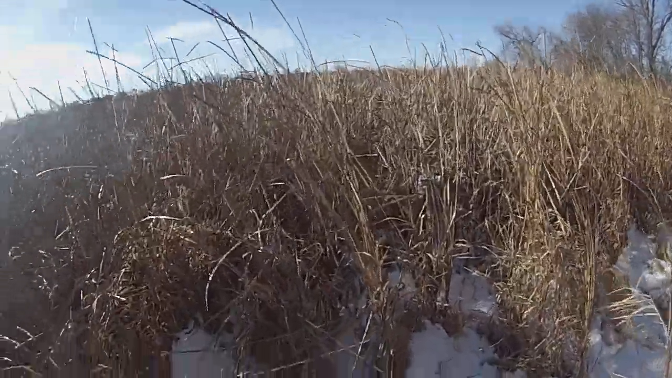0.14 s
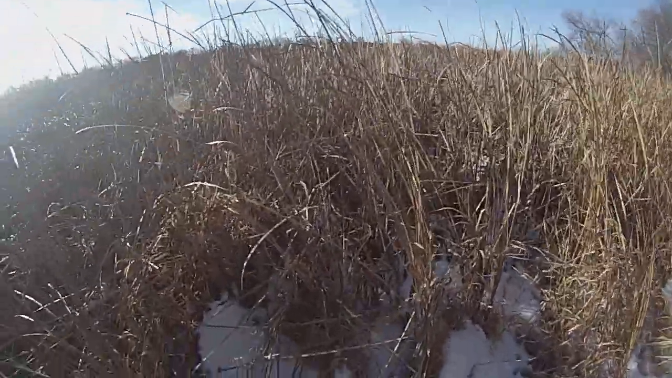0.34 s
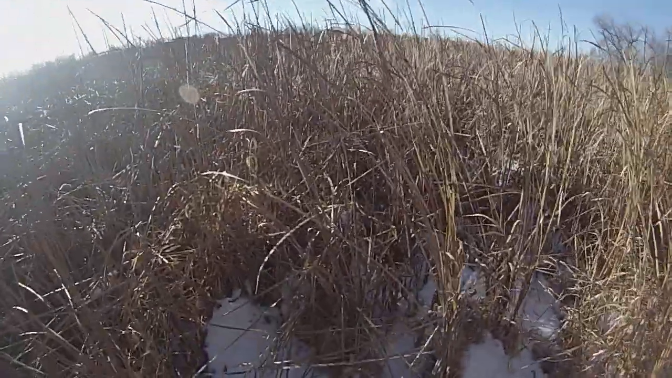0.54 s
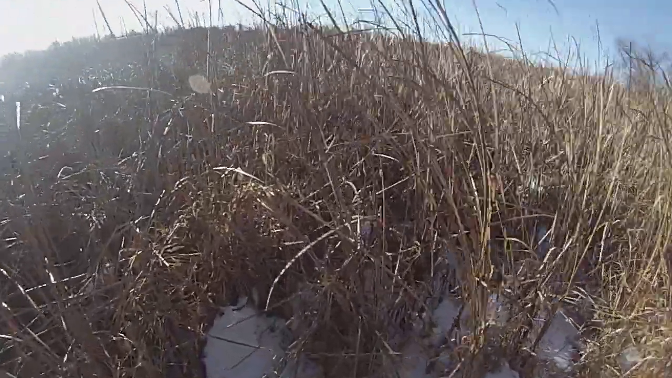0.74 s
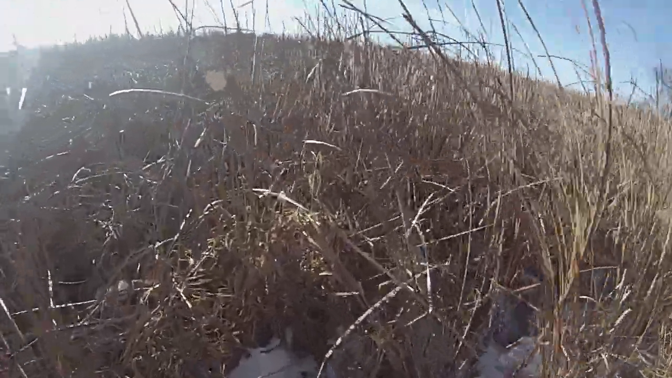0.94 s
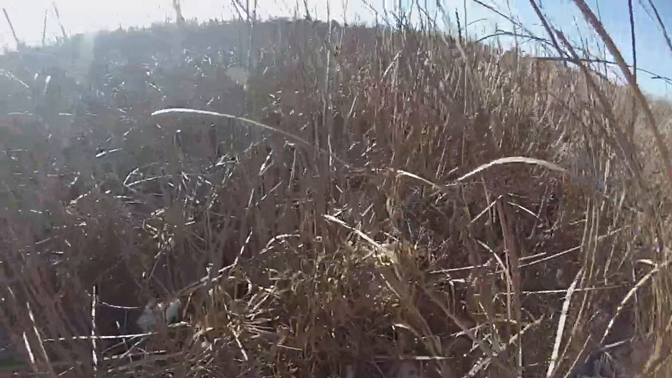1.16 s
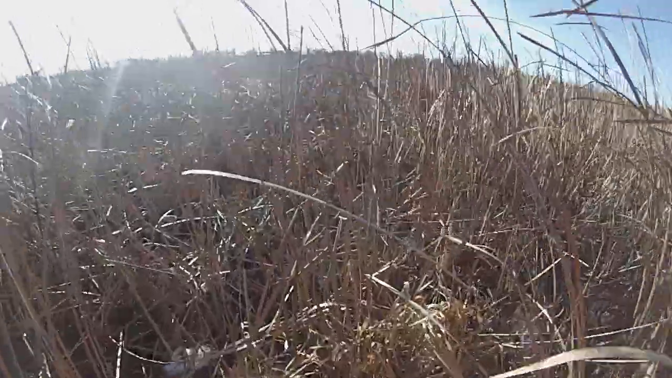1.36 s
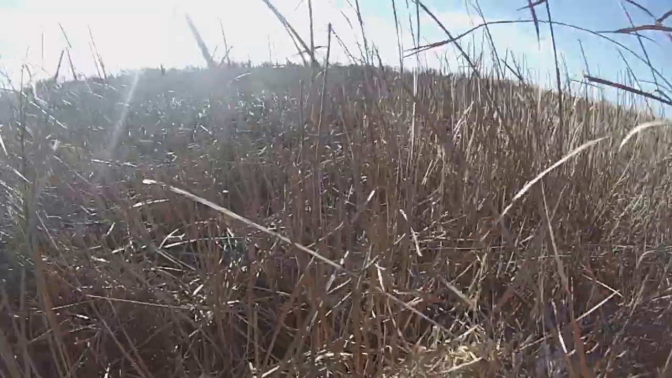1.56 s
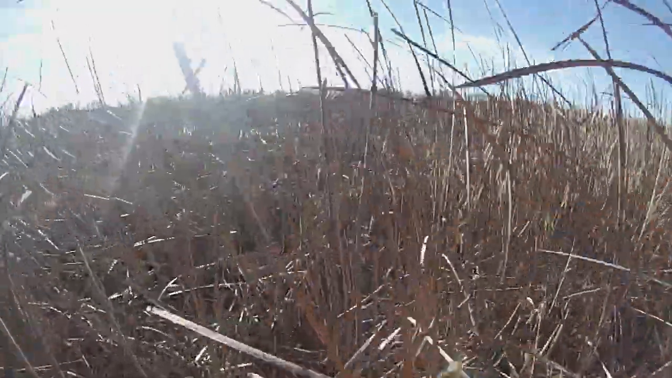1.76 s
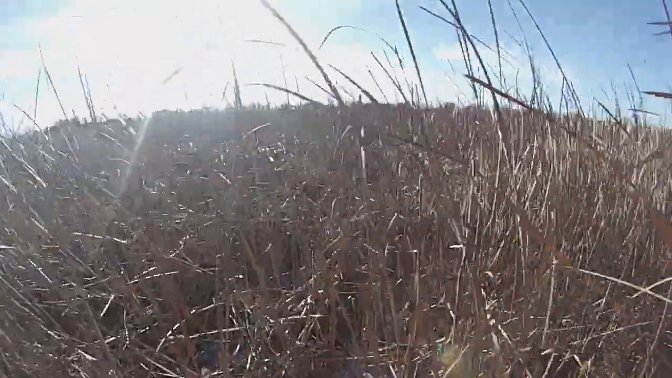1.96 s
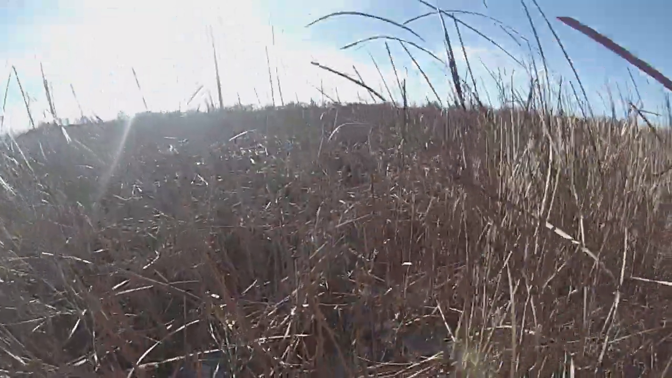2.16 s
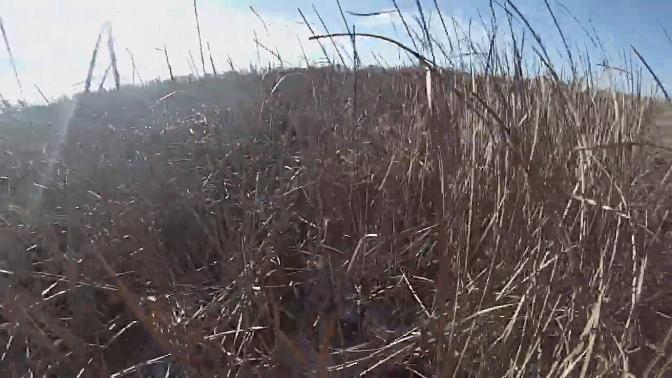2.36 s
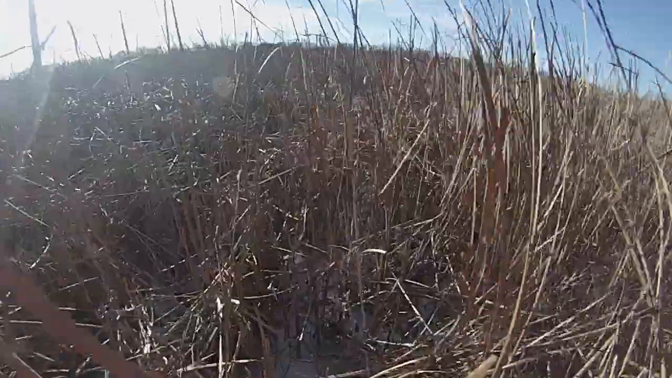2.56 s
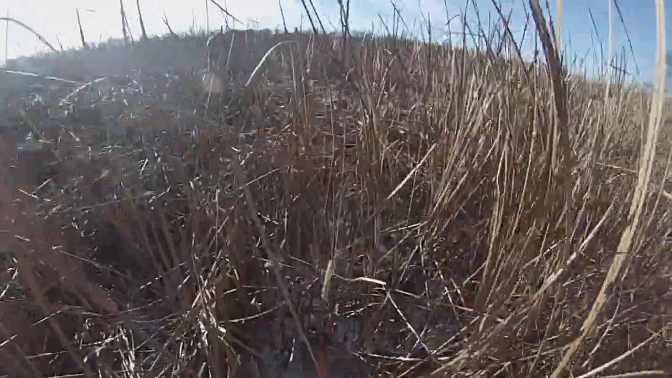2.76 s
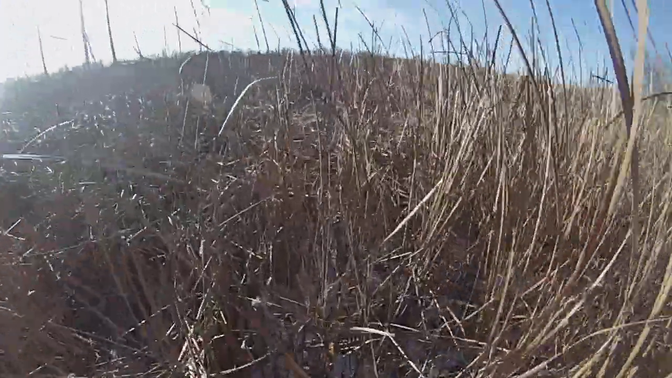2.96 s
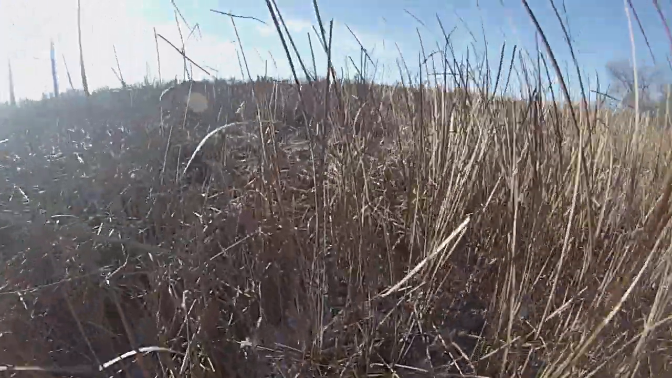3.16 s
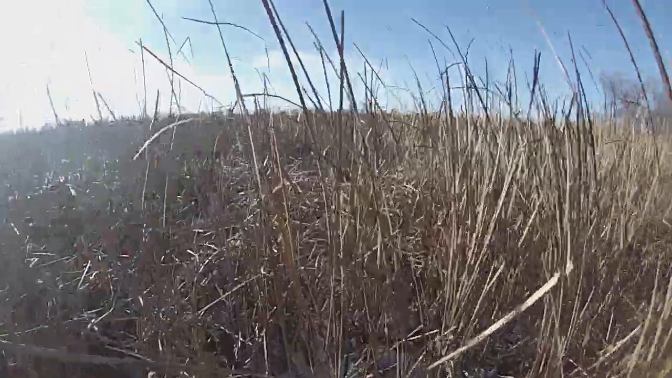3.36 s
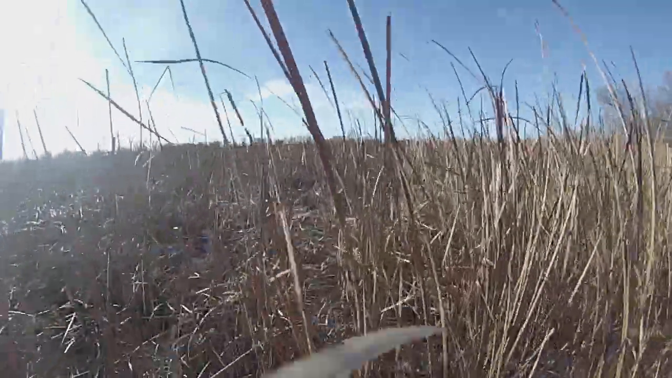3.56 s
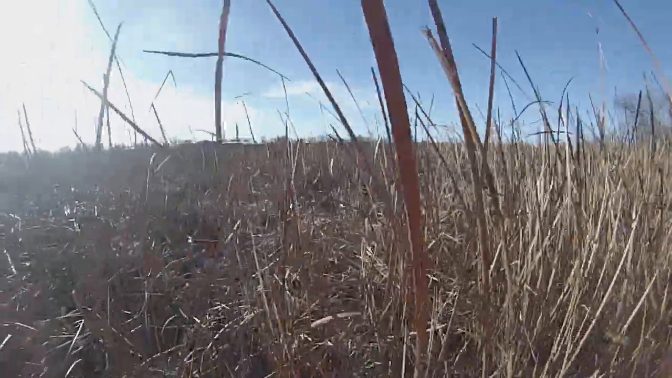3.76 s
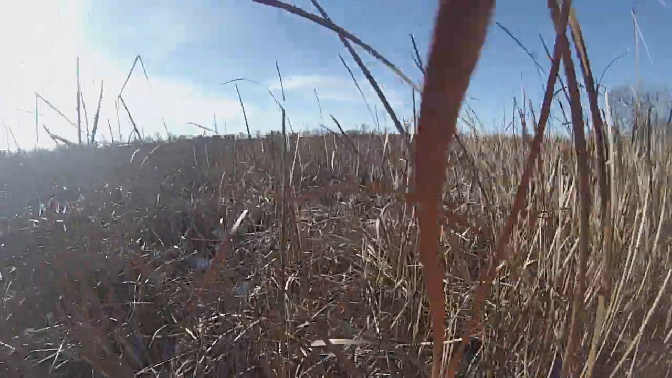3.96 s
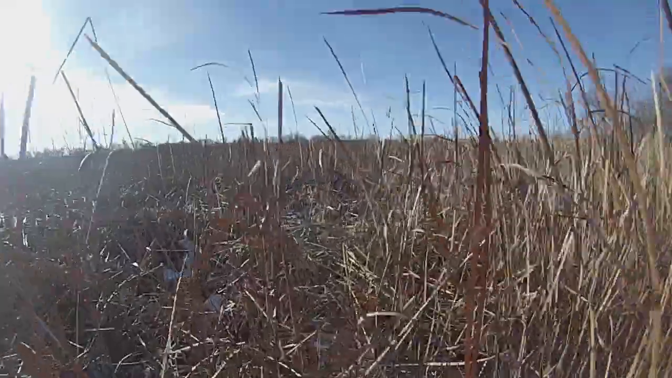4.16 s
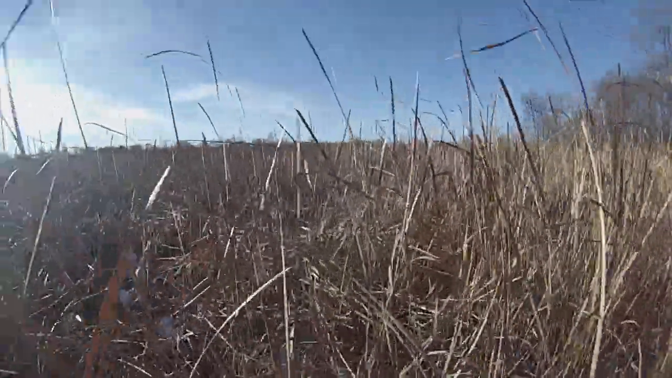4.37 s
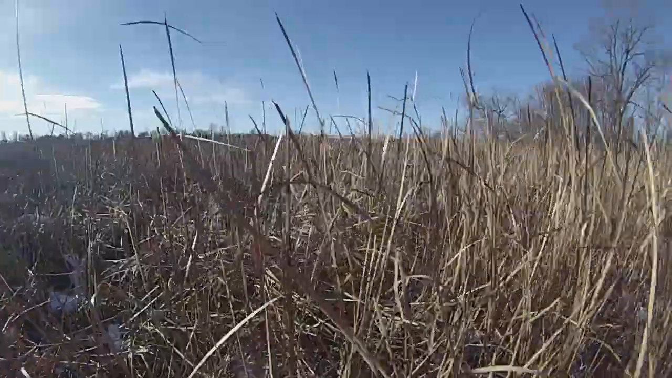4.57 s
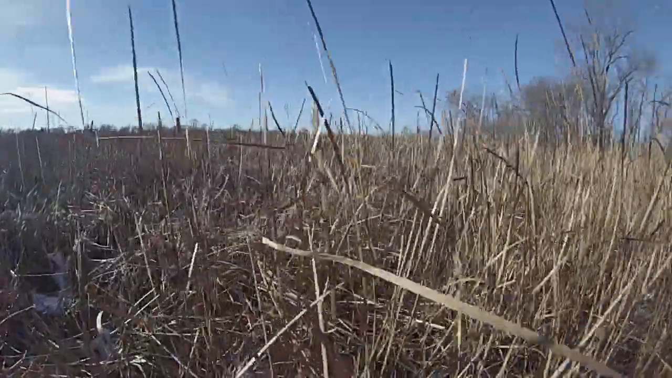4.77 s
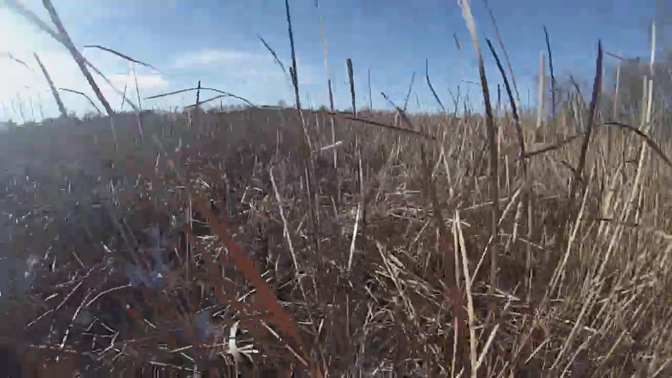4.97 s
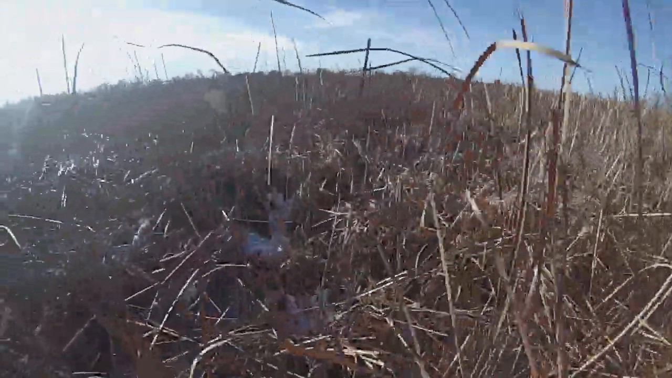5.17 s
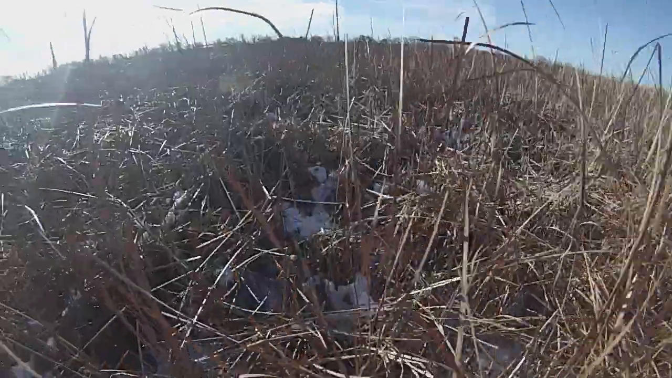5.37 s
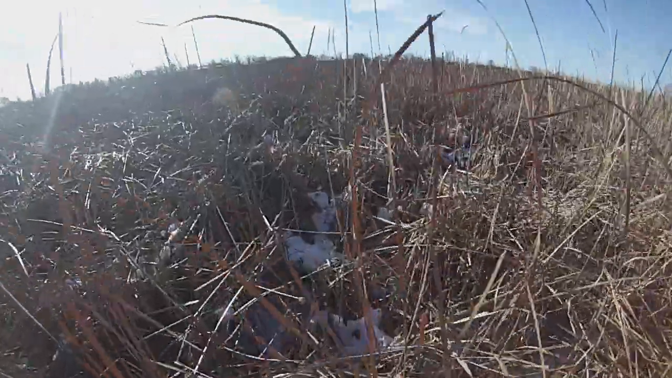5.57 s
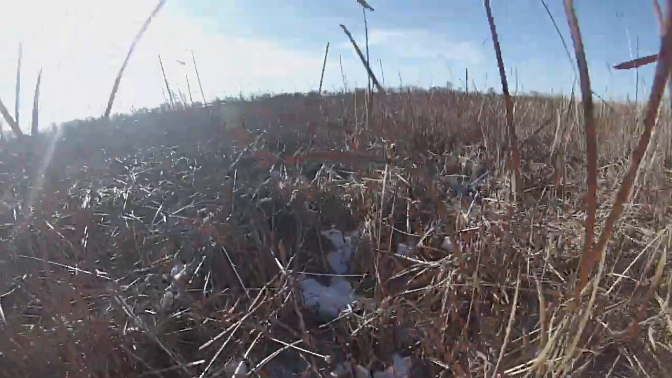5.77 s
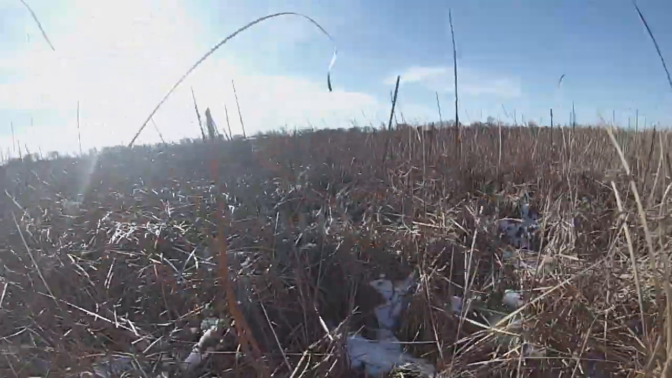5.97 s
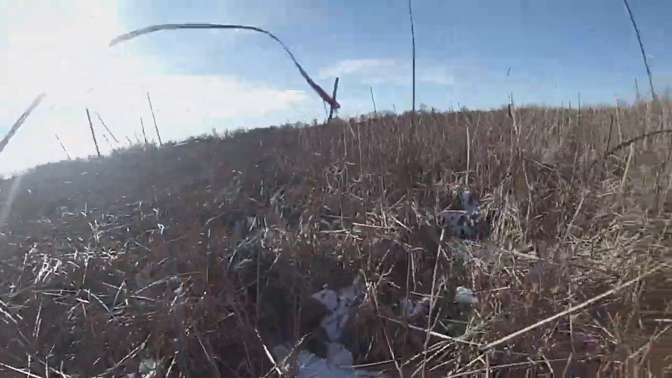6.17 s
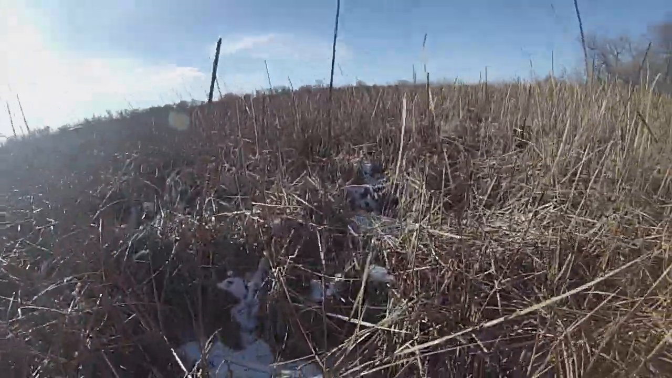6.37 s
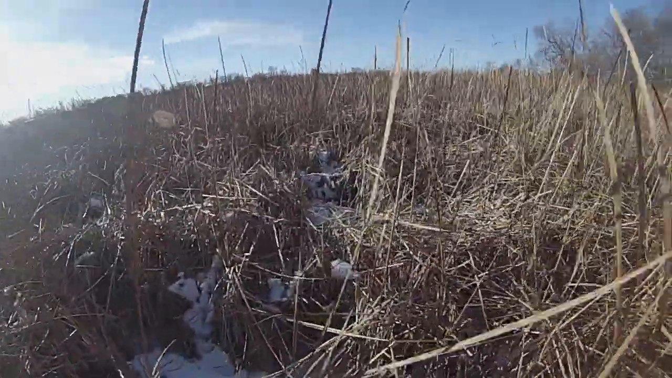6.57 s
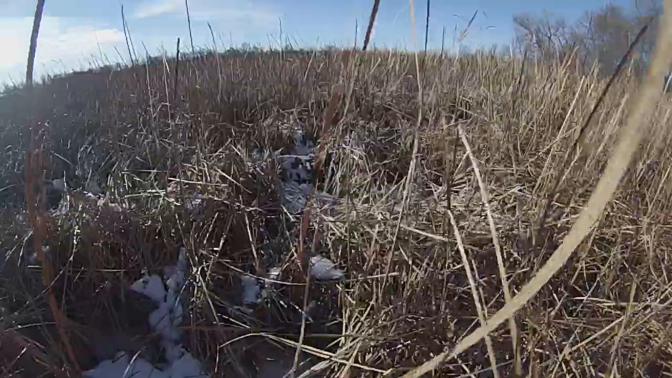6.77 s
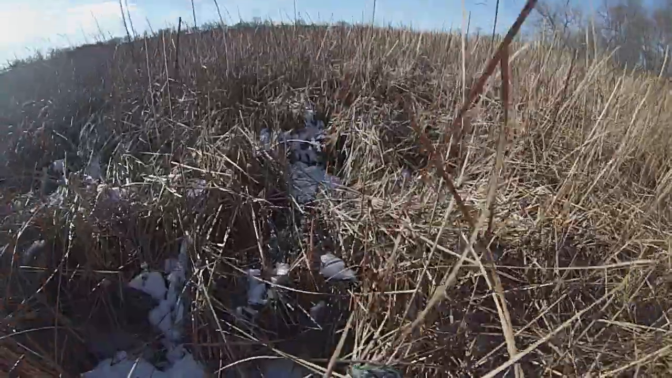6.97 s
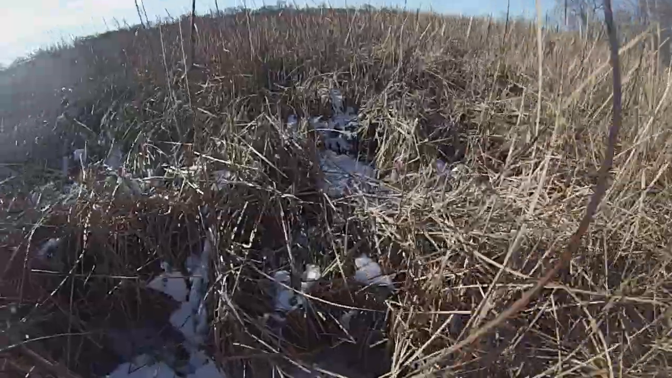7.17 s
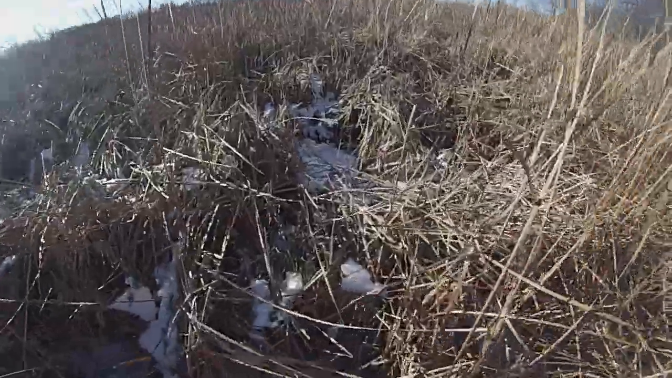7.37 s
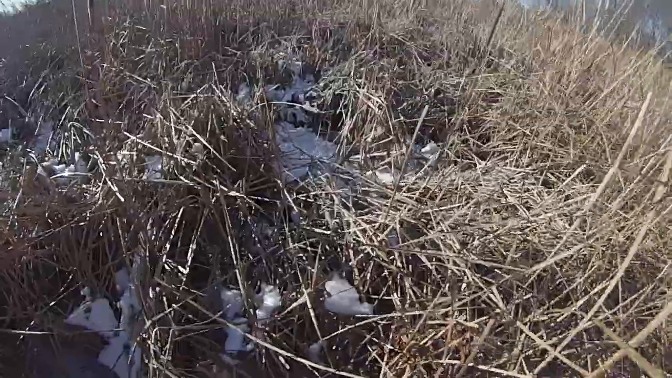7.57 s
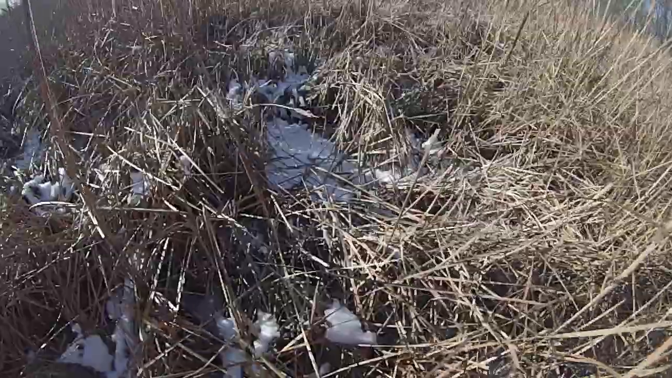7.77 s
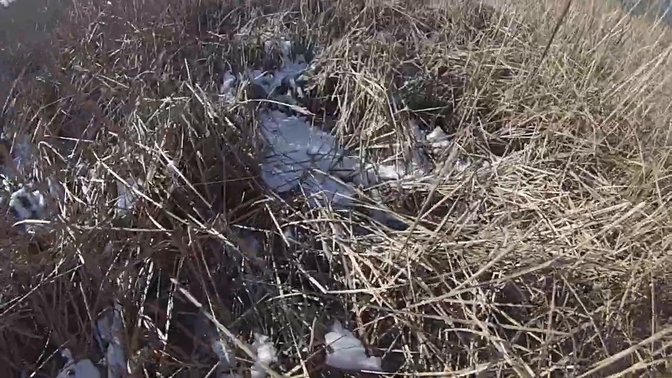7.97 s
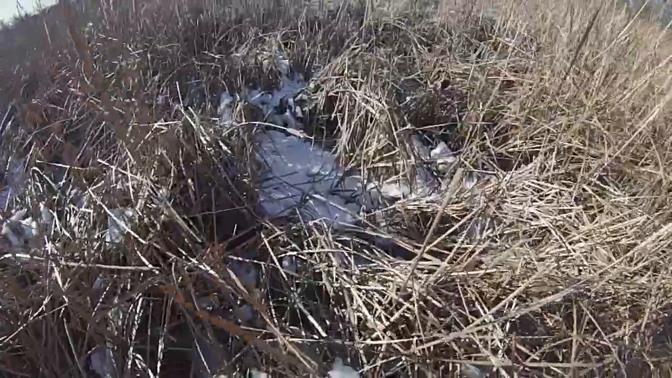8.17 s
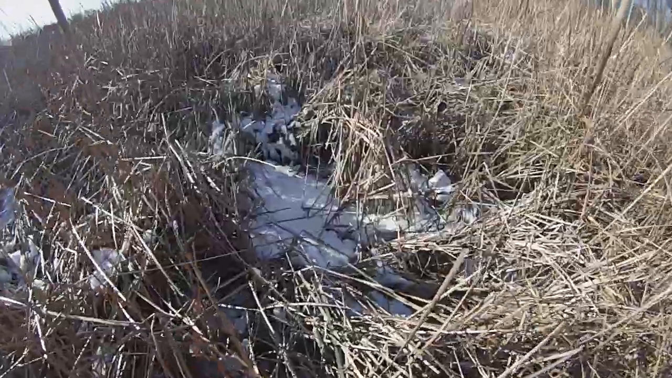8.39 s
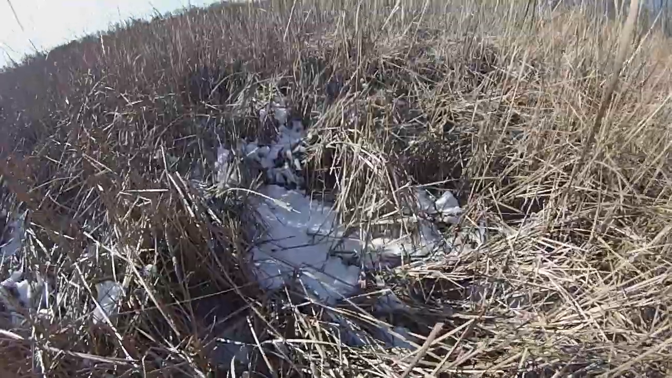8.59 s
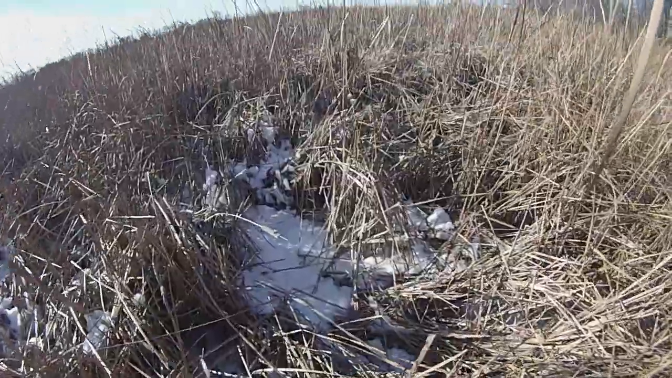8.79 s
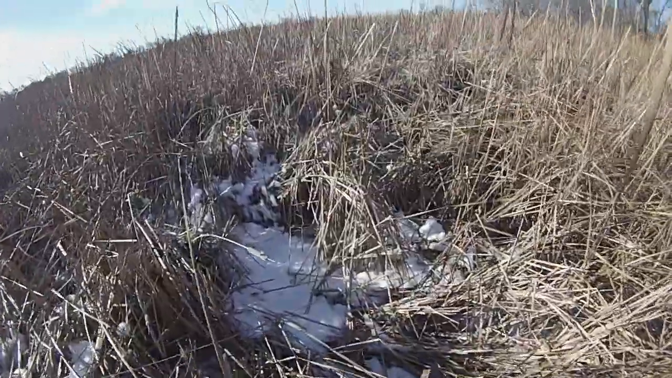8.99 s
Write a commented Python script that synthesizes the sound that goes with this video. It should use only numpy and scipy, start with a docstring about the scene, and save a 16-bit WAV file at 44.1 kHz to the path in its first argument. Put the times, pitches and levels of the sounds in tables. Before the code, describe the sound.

A camera in a hard plastic case pushes through dry winter reeds, heard very close and dry, in mono. From 0 to 1.5 s the rustle is thin, with a low jolt near 0.9 and a clear tap at 1.1. A sharper flick lands at 1.7 as dense crackling, papery hiss and stem crunch close in, swelling around 2.4 and 3.2; a deep thump comes near 3.5. From 3.7 a stalk catches and rasps along the case, juddering harder until it slips off at 4.26 with a loud ringing knock. At 5.16 the hardest, brightest crack strikes, and the surroundings duck briefly and recover. Rustling continues with faint leaf squeaks near 6.2 and 6.65, then bright brittle sweeps at 7.3 to 7.5. Heavy muffled thumps around 8.1 and 8.4 accompany looser rustling to about 9 s, over low swaying rumble and faint open-air hush.

```python
"""In a winter marsh, a camera in a plastic case is carried through dense dry reeds.
Leaf friction, as dense random clicks, gives rustle, crunch and hiss; narrow noise bands give squeaks.
A stalk rasps along the case and slips off; others flick it as damped resonances with sharp cracks.
Steps jolt it with low thumps of slowing pitch, over a swaying rumble and the faint hush of the air.
The case colours leaves and cracks by its resonances; the hardest flick makes the limiter duck."""
import sys
import numpy as np
from scipy import signal
from scipy.fft import rfft, irfft, next_fast_len
from scipy.io import wavfile
from scipy.ndimage import uniform_filter1d

SR = 44100
rng = np.random.default_rng(int(sys.argv[2]) if len(sys.argv) > 2 else 0)


def digitize_waveform(pressure):
    """Quantize a signal to 16-bit integers and store it at the path in sys.argv[1].

    Rows of a 2-D input are taken as channels; values are limited to [-1, 1].
    """
    field = np.atleast_2d(pressure).T
    bounded = np.clip(field, -1, 1)
    quanta = np.round(bounded * 32767).astype(np.int16)
    wavfile.write(sys.argv[1], SR, quanta)


N = 398223
TIME = np.arange(N) / SR   # s


def from_db(db):
    """Decibel law: 20 dB is a factor of ten in amplitude."""
    return 10 ** (np.asarray(db) / 20)


def rms_one(x):
    """Normalization by effective value: scale to RMS 1."""
    return x / np.sqrt(np.mean(x ** 2) + 1e-20)


def peak_one(x):
    """Normalization by peak: scale to a largest magnitude of 1."""
    return x / np.max(np.abs(x))


def add(out, s, sound):
    """Superposition: mix a short sound in at time s."""
    at = max(round(s * SR), 0)
    out[at:at + len(sound)] += sound[:N - at]


def drift(rate):
    """Random modulation: slow chance of spread 1, with `rate` knots per second."""
    knots = rng.standard_normal(20000)
    # straight lines between knots lower the variance to 2/3
    return np.interp(TIME * rate, np.arange(len(knots)), knots) * np.sqrt(3 / 2)


def cut(x, hz, kind, order=2):
    """Frequency selection by a maximally flat (Butterworth) filter."""
    hz = np.minimum(hz, SR / 2 - 1)
    return signal.sosfilt(signal.butter(order, hz, kind, fs=SR, output="sos"), x)


def colour(x, spectrum):
    """Spectral shaping: weight a steady sound by a curve of f/Hz, level/dB."""
    hz, db = np.transpose(spectrum)
    size = next_fast_len(N)
    bins = np.maximum(np.fft.rfftfreq(size, 1 / SR), 1)
    gain = from_db(np.interp(np.log(bins), np.log(hz), db))
    return irfft(rfft(x, size) * gain, size)[:N]


def resonance(x, hz, width):
    """Damped oscillator: a two-pole resonance with gain 1 on top."""
    r = np.exp(-np.pi * width / SR)
    feedforward = (1 - r * r) / 2 * np.array([1, 0, -1])
    feedback = [1, -(1 + r * r) * np.cos(2 * np.pi * hz / SR), r * r]
    return signal.lfilter(feedforward, feedback, x + 1e-18)


# Resonances of the case: f/Hz, width/Hz, lift/dB
CASE_MODES = [(1610, 220, 8), (2506, 330, 4), (3191, 600, 4.5), (5151, 390, 7.5), (5586, 320, 7.5),
              (6600, 200, 5), (7993, 550, 10.5), (9604, 1000, 4.5), (11950, 1500, 2.5)]


def through_case(x):
    """Modal transmission: the case lifts what passes at each of its resonances, in series."""
    for hz, width, lift_db in CASE_MODES:
        x = x + (from_db(lift_db) - 1) * resonance(x, hz, width)
    return x


def slips(per_s, spread_db, smooth_db):
    """Stick-slip friction: random clicks of uneven size over smooth noise, together at RMS 1."""
    sizes = from_db(spread_db * np.minimum(rng.exponential(1, N), 5))
    signed = sizes * rng.choice([-1, 1], N)
    clicks = signed * (rng.random(N) < per_s / SR)
    blur = from_db(smooth_db) * rng.standard_normal(N)
    return rms_one(rms_one(clicks) + blur)


# Spectrum of dry leaf contacts: f/Hz, level/dB (per Hz)
LEAF_SPECTRUM = [(100, -1), (250, -1), (500, 0), (900, 2), (1170, -3), (1600, 0), (3000, -2.5), (4200, -8),
                 (5500, -5), (8000, -8.5), (11000, -7), (13000, -7), (15500, -12.5)]


def rustle(clump_db=0.9755, crunch_db=1.0, leaf_db=0.6829, hiss_db=0.12, tick_db=-11.5, flutter_db=0.9371):
    """Superposed contacts in clumps: stems crunch low, leaves rustle, dry edges hiss, flutter and tick."""
    crunch, leaf, hiss = brushing()
    clumps = from_db(clump_db * drift(55))
    hiss = hiss * from_db(flutter_db * drift(70))
    ticks = from_db(tick_db) * slips(per_s=100, spread_db=3.5, smooth_db=-30)
    bands = [([170, 1300], crunch * from_db(crunch_db)),
             ([1300, 4300], leaf * from_db(leaf_db)),
             ([4300, 17000], hiss * from_db(hiss_db))]
    out = 0
    for band_hz, level in bands:
        contacts = colour(slips(per_s=7000, spread_db=4.5, smooth_db=2.0) + ticks, LEAF_SPECTRUM)
        band = through_case(cut(contacts, band_hz, "band", order=5))
        out = out + level * rms_one(band)
    return clumps * out


# Tufts of leaves sweeping past: t/s (peak), length/s, rustle level/dB, hiss level/dB (before the rustle trims)
TUFTS = [(.11, 0.054, -76.5, -75), (0.515, 0.092, -70, -70.5), (0.722, 0.148, -75.5, -69.5),
         (0.929, 0.15, -68, -63.5), (1.633, 0.32, -64.5, -58.5), (1.865, 0.048, -71, -64.5),
         (2.052, 0.174, -65.5, -61.5), (2.422, 0.243, -61, -56.5), (2.675, 0.101, -68, -62),
         (2.931, 0.13, -61, -57), (3.241, 0.181, -58.5, -54), (3.57, 0.136, -65, -68),
         (4.095, 0.14, -62, -59), (4.357, 0.045, -63.5, -59.5), (4.475, 0.051, -66.5, -60),
         (4.894, 0.446, -61.5, -61), (5.59, .14, -61, -61), (5.77, 0.286, -68, -65),
         (6.429, 0.057, -59.5, -57.5), (6.604, 0.227, -65, -57), (7.068, .1, -65, -66),
         (7.275, 0.149, -55.5, -52.5), (7.431, 0.173, -54, -48), (7.542, 0.154, -60.5, -62),
         (7.901, 0.114, -58.5, -58), (8.11, 0.179, -58, -55.5), (8.285, 0.052, -59.5, -66.5),
         (8.466, 0.101, -60.5, -68), (8.744, 0.299, -61, -62.5), (8.991, 0.128, -59.5, -59)]
SWISH_RISE_SHARE = 0.562   # part of a swish spent swelling
THICKET_HISS_DB = -0.75   # hiss of the leaf edges re their rustle
CRUNCH_DB, CRUNCH_FOLLOWS = -34, 0.5802   # stem crunch at full-scale rustle; share of the rustle's swing
SCUFF_DB, SCUFF_S = -40.5, .035   # stems crushed by a jolt re its peak; time to die away


def brushing():
    """Power addition: tufts swell out of the steady thicket; stems follow the leaves and the jolts."""
    t, steady = TIME[::64], from_db(thicket_db()[::64])
    leaf, hiss = steady, steady * from_db(THICKET_HISS_DB)
    for s, length, leaf_db, hiss_db in TUFTS:
        reach = length * np.where(t < s, SWISH_RISE_SHARE, 1 - SWISH_RISE_SHARE)
        swell = np.exp(-((t - s) / reach) ** 2)
        leaf = np.hypot(leaf, from_db(leaf_db) * swell)
        hiss = np.hypot(hiss, from_db(hiss_db) * swell)
    leaf, hiss = np.interp(TIME, t, leaf), np.interp(TIME, t, hiss)
    following = from_db(CRUNCH_DB) * leaf ** CRUNCH_FOLLOWS
    crunch = np.hypot(following, from_db(SCUFF_DB) * around_jolts(SCUFF_S))
    return crunch, leaf, hiss


# How thickly the reeds press around the camera, as steady rustle: t/s, level/dB (before the rustle trims)
REED_DENSITY = [(0, -71.5), (.75, -73), (1.0, -67.5), (1.38, -71.5), (1.62, -60.5), (2.78, -62),
                (3.35, -58), (3.8, -64.5), (4.3, -61), (4.62, -62.5), (5.1, -61.5), (5.35, -61),
                (6.15, -59), (7.05, -59.5), (7.7, -63), (8.55, -64.5), (9.03, -62)]


def thicket_db():
    """Source density: level of the steady rustle at every sample."""
    return np.interp(TIME, *np.transpose(REED_DENSITY))


# Spectrum of the stalk's rasp on the case: f/Hz, level/dB (per Hz)
RASP_SPECTRUM = [(250, -10), (400, -7.5), (650, -4.5), (910, 0), (1150, -7.5), (1450, -12.5), (1700, 2),
                 (2200, -4), (3050, -2), (3500, -12), (3850, -8.5), (4300, -22), (5400, -23.5),
                 (6500, -35.5), (12000, -41)]
# Free ringing of the shell, played by the drag and the flicks: f/Hz, level/dB (before the blow's gain), t60/s
SHELL_MODES = [(1862, -42.5, 0.21), (2220, -37.5, 0.094), (2562, -34, .05), (3006, -29, 0.034),
               (4671, -32.5, 0.022), (5330, -37, 0.033)]


def dragging_stalk(shell_db=-3, judder_db=1.0):
    """Friction drive: a stalk rasps and judders along the case and stirs the shell's lowest mode."""
    pressure = rub_pressure() * from_db(judder_db * drift(130))
    rub = colour(slips(per_s=6600, spread_db=0.0, smooth_db=-1.0), RASP_SPECTRUM)
    lowest_hz = SHELL_MODES[0][0]
    rub = rub + from_db(shell_db) * resonance(rub, lowest_hz, 40)
    return pressure * rms_one(rub)


# A stalk catching on the case, hardest just before it slips off: t/s (start), length/s, level/dB (before sag)
STALK_RUBS = [(3.683, 0.06, -60.5), (3.801, .07, -56), (3.879, 0.0684, -54.5), (3.952, 0.027, -45.5),
              (3.981, 0.0743, -41.5), (4.052, .18, -44), (4.237, 0.0126, -24.5), (4.255, .03, -36.5),
              (4.263, 0.0049, -24.5)]
# part spent taking hold; loss over the rub; time to let go
RUB_ATTACK_SHARE, RUB_SAG_DB, RUB_RELEASE_S = .13, 5.5, .004


def rub_pressure():
    """Contact force: each rub takes hold, eases as the stalk slides, and lets go."""
    pressure = 0
    for s, length, db in STALK_RUBS:
        age = np.maximum(TIME - s, 0)
        attack = np.minimum(age / (RUB_ATTACK_SHARE * length), 1)
        release = np.exp(-np.clip((age - length) / RUB_RELEASE_S, 0, 20))
        easing = from_db(db - RUB_SAG_DB * np.minimum(age / length, 1))
        pressure = pressure + attack * release * easing
    return pressure


# Stalks flicking the case: t/s, knock peak level/dB, knock f/Hz, knock width/Hz, crack level/dB (re knock)
STALK_FLICKS = [(.51, -50, 1700, 600, -12), (1.1032, -26, 2000, 800, -2.5), (1.368, -44.5, 5430, 1200, 1),
                (1.443, -42, 5470, 1500, 8), (1.484, -44, 5440, 1500, 10), (1.6, -46.5, 890, 600, -10),
                (1.708, -16.5, 1893, 780, 3), (1.87, -44.5, 1810, 600, -2.5), (2.035, -47, 5500, 1500, 8),
                (2.145, -36, 1653, 900, 1), (2.146, -44, 550, 700, -12), (2.2, -45.5, 1300, 900, -8),
                (2.49, -41.5, 2290, 700, 6.5), (3.6925, -42, 750, 900, -11.5),
                (3.723, -33, 2260, 700, -18.5), (3.7241, -41.5, 980, 700, -21),
                (3.811, -41.5, 1830, 900, -16.5), (4.196, -29.5, 1765, 500, -19.5),
                (4.242, -22, 1730, 450, -14), (4.25, -17, 1675, 401, -21.5), (4.2625, -23, 720, 350, -21.5),
                (4.2625, -5.5, 2413, 451, -13.5), (4.2633, -3.8, 1741, 334, -23),
                (4.2632, -14.5, 3234, 400, -16.5), (4.355, -45, 5200, 1500, 18),
                (4.922, -46, 736, 400, -13), (5.159, 9.5, 2777, 845, 3.5), (5.1593, -1, 4720, 690, -2.5),
                (5.1596, -6.5, 1628, 400, -6), (5.1615, -3.5, 3000, 706, -1), (5.578, -47, 2000, 405, -2.5),
                (5.839, -38, 5500, 1550, 8.5), (5.949, -41.5, 1643, 500, -10.5), (6.44, -42, 1930, 600, -7),
                (7.276, -43.5, 8000, 2500, -4.5), (7.441, -30.5, 7500, 2500, 1.5),
                (8.13, -46, 600, 600, -11.5)]
# Blows hard enough to set the shell ringing: t/s, gain on the shell modes: level/dB
RINGING_BLOWS = [(4.263, 6), (5.159, 5.5)]


def flicks(crack_low_hz=100, crack_top_hz=11500, skirt=.8):
    """Impulse response: a damped stalk knock and a crack through the case; the hardest ring the shell."""
    out, t = np.zeros(N), TIME[:SR // 3]
    click = signal.unit_impulse(len(t))
    crack = cut(cut(click, crack_low_hz, "high", order=1), crack_top_hz, "low")
    crack = peak_one(through_case(crack))
    ring = sum(from_db(db - 60 * t / t60) * np.sin(2 * np.pi * hz * t) for hz, db, t60 in SHELL_MODES)
    for s, peak_db, hz, width, crack_db in STALK_FLICKS:
        knock = resonance(resonance(click, hz, width), hz, width)
        # a thin stalk radiates little below its own resonance
        knock = peak_one(cut(knock, skirt * hz, "high", order=3))
        add(out, s, from_db(peak_db) * (knock + from_db(crack_db) * crack))
    for s, ring_db in RINGING_BLOWS:
        add(out, s, from_db(ring_db) * ring)
    return out


# Spectrum of the swaying rumble: f/Hz, level/dB (per Hz)
SWAY_SPECTRUM = [(12, 0), (25, 1), (50, -3), (80, -15), (120, -22), (200, -29), (400, -44.5), (1000, -86.5)]
SWAY_DB, SWAY_FOLLOWS = -22.5, 0.49   # handling rumble at full-scale rustle; share of the thicket's swing
WOBBLE_DB, WOBBLE_S = -20, 0.14   # rumble around a jolt re its peak; time to settle
# Steps and jolts, also followed by around_jolts: t/s, swell peak level/dB, f/Hz at the swell's peak (higher
# before it, slowing after)
STEP_JOLTS = [(.005, -30.5, 30.47), (0.949, -26.5, 28.74), (1.019, -38, 21.6), (1.767, -30.5, 49.6),
              (1.802, -30, 29), (2.471, -35.5, 40.7), (2.531, -34, 31.8), (2.626, -37, 48.2),
              (3.441, -33, 67), (3.467, -22.5, 28.16), (3.906, -31, 50.6), (4.147, -28, 51),
              (4.244, -24.5, 33.5), (4.326, -28, 56.8), (5.0, -32, 39.4), (5.07, -36.5, 22),
              (5.842, -27.5, 58.2), (5.861, -25, 33.8), (5.931, -29.5, 24.1), (6.241, -38, 34.4),
              (6.482, -29, 47), (6.69, -22, 42.5), (6.801, -30, 21.1), (7.46, -33.5, 41.6),
              (7.514, -26.5, 31.2), (7.613, -32, 22.75), (8.106, -28.5, 59.8), (8.134, -18, 31.46),
              (8.235, -29.5, 21.95), (8.424, -21.5, 26.52)]


def thumps(rise_cycles=0.838, steepness=2.77, sag=0.17, shudder_db=-27, shudder_hz=(58, 122)):
    """Mass on a mount: jolts swing the camera for a few slowing cycles, with shudder; a sway rumbles on."""
    out, t = np.zeros(N), TIME[:SR // 3]
    for s, peak_db, hz in STEP_JOLTS:
        age = t * hz / rise_cycles
        swell = (age * np.exp(1 - age)) ** steepness
        turns = np.cumsum(hz * (1 + sag) / (1 + sag * age)) / SR
        shudder = rms_one(cut(rng.standard_normal(len(t)), shudder_hz, "band", order=4))
        swing = np.sin(2 * np.pi * turns) + from_db(shudder_db) * shudder
        add(out, s, from_db(peak_db) * swell * swing)
    handling = from_db(SWAY_DB + SWAY_FOLLOWS * thicket_db())
    sway = np.hypot(handling, from_db(WOBBLE_DB) * around_jolts(WOBBLE_S))
    return out + sway * rms_one(colour(rng.standard_normal(N), SWAY_SPECTRUM))


def around_jolts(settle_s, lead_share=0.33):
    """Exponential decay: a gain that builds into each jolt and dies away after it, summed in power."""
    t, power = TIME[::64], 0
    for s, peak_db, _ in STEP_JOLTS:
        away = np.maximum(t - s, (s - t) / lead_share)
        power = power + (from_db(peak_db) * np.exp(-away / settle_s)) ** 2
    return np.interp(TIME, t, np.sqrt(power))


# Leaves squeaking on one another: t/s (middle), length/s, f/Hz, level/dB (before the swell)
LEAF_SQUEAKS = [(0.236, 0.115, 9330, -70), (0.856, 0.069, 2807, -67.5), (3.568, 0.1, 3444, -60.5),
                (6.185, .07, 3130, -60), (6.654, 0.047, 2473, -54)]


def squeaks(width_share=0.031):
    """Narrow-band noise: a leaf sliding on another sings briefly in a narrow, rough band."""
    out = np.zeros(N)
    for s, length, hz, db in LEAF_SQUEAKS:
        swell = np.hanning(int(length * SR))
        tone = rms_one(resonance(rng.standard_normal(len(swell)), hz, width_share * hz))
        add(out, s - length / 2, from_db(db) * swell * tone)
    return out


# Spectrum of the steady outdoor hush: f/Hz, level/dB (per Hz)
AIR_SPECTRUM = [(100, 7.5), (200, 5.5), (400, 3), (900, -3.5), (2000, -5), (4000, -12), (8000, -18.5),
                (15500, -22)]


def air(level_db=-64.5):
    """Stationary noise: the faint hush of the open marsh."""
    return from_db(level_db) * rms_one(colour(rng.standard_normal(N), AIR_SPECTRUM))


def scene():
    """Linear superposition of all the sources, in one channel."""
    return (rustle() + dragging_stalk() + flicks() + thumps() + squeaks() + air())[None]


def limiter(x, release_db_per_s=21, ahead_s=0.016):
    """Gain control: the gain drops just ahead of a peak above full scale and creeps back."""
    over_db = 20 * np.log10(np.maximum(np.abs(x).max(axis=0), 1))
    release_db = release_db_per_s * TIME
    held_db = np.maximum.accumulate(over_db + release_db) - release_db
    early_db = np.maximum(held_db, np.interp(TIME + ahead_s, TIME, held_db))
    return x * from_db(-uniform_filter1d(early_db, size=128))


CUTOFF_HZ = 15500


def record(dry):
    """Band limitation: the limiter, then a steep (elliptic) top cut."""
    top_cut = signal.ellip(10, .1, 70, CUTOFF_HZ, fs=SR, output="sos")
    return signal.sosfilt(top_cut, limiter(dry))


dry = scene()
out = record(dry)
digitize_waveform(out)
```